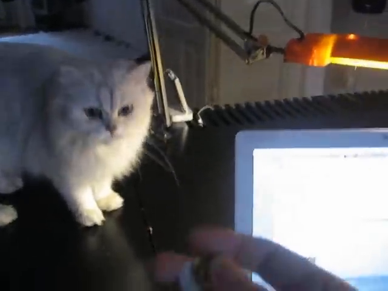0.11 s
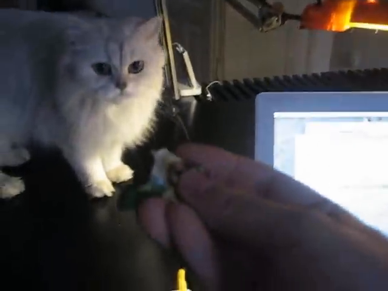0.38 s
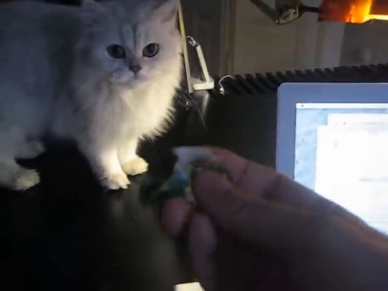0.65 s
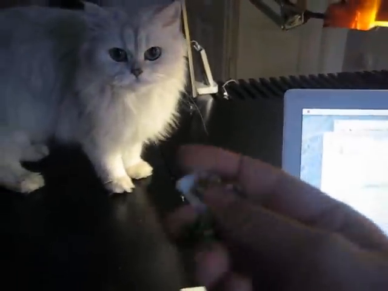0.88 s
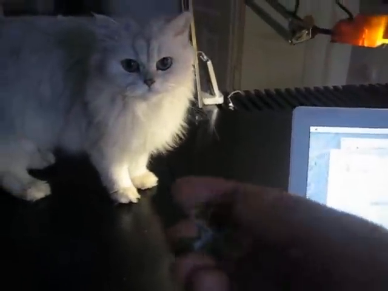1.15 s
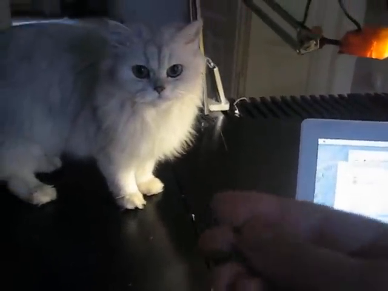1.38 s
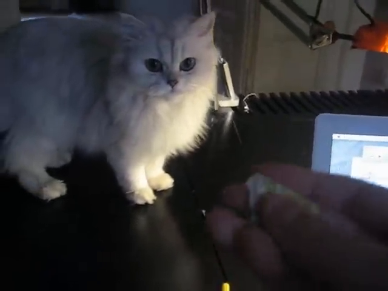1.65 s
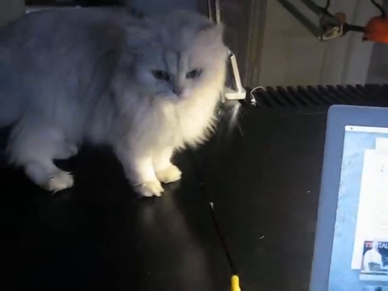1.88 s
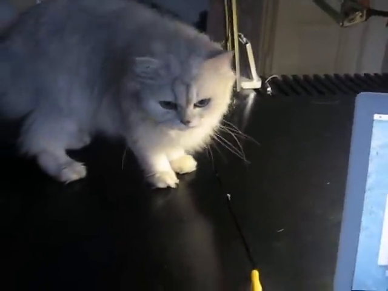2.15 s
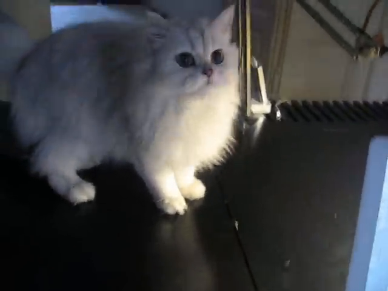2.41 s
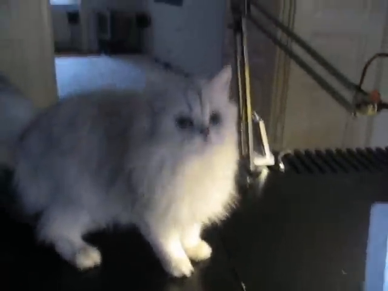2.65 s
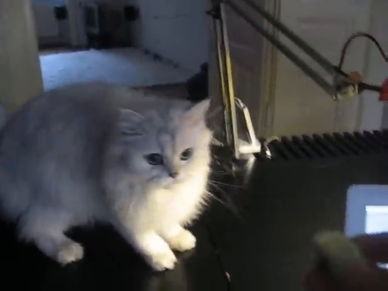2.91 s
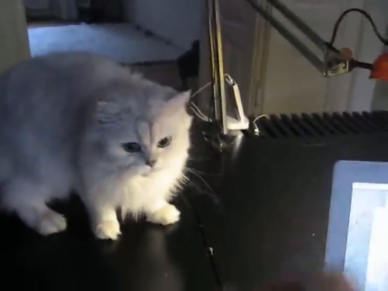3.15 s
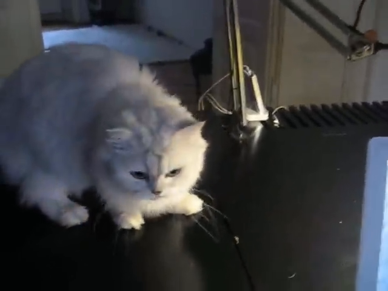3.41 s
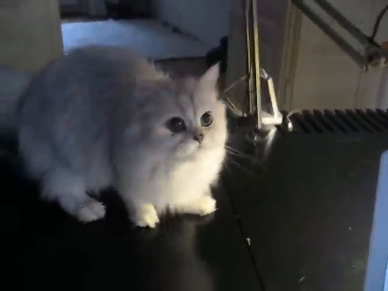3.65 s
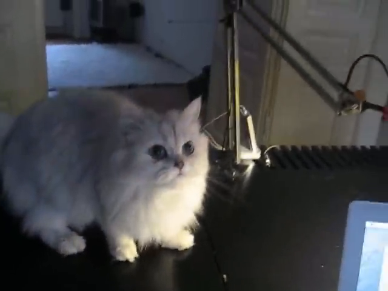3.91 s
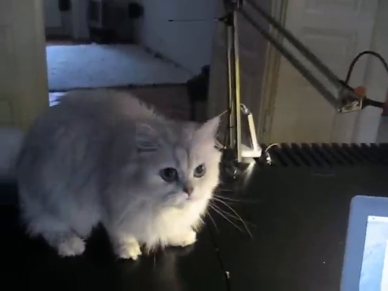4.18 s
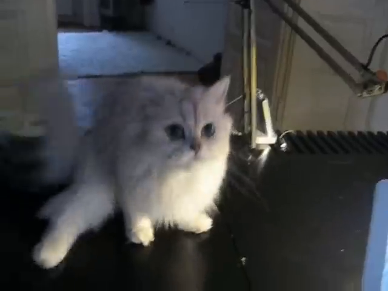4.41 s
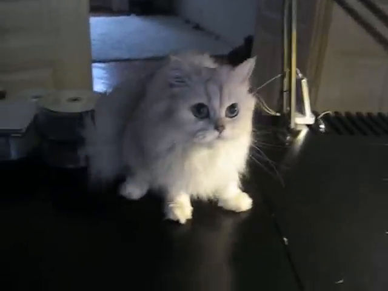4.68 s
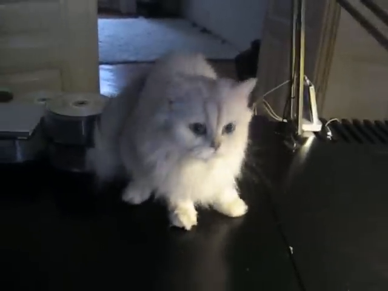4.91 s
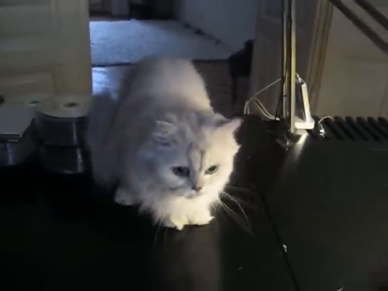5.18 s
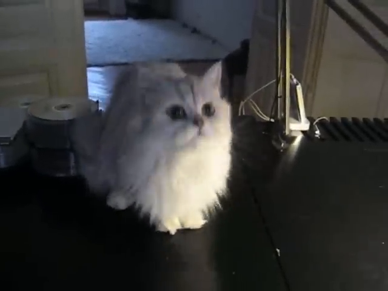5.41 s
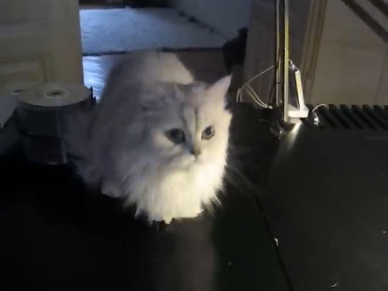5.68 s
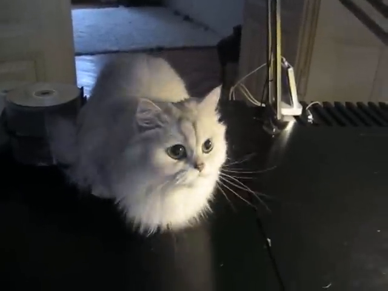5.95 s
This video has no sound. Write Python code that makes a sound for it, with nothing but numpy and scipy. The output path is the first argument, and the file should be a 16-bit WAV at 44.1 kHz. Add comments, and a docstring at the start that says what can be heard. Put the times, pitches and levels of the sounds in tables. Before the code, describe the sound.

Fingers crumple a thin candy wrapper very close to a cheap camera microphone. Sharp, irregular snaps crowd the first second, then come in scattered pops and small rustles, with a few loud cracks later. A quiet small room adds a short faint tail, low rumble and hum. The sound is coarse and gritty, and a couple of tiny hollow taps occur near the end.

```python
"""Crumpled candy wrapper

A wrapper is squeezed near a small camera: creases snap as damped sines over a rustle of tiny grains,
with random crackles, puffs of air and a few hollow taps. A quiet room answers with a decaying noise tail
and rumbles: shaped noise, hum and throb, plus a faint hiss.
The camera samples coarsely, in 8-bit steps, and each sample is held on playback."""
import sys
import numpy as np
from scipy import signal
from scipy.fft import rfft, irfft, next_fast_len
from scipy.io import wavfile
from scipy.ndimage import uniform_filter1d, map_coordinates

SR = 44100
rng = np.random.default_rng(int(sys.argv[2]) if len(sys.argv) > 2 else 0)


def dump(signal):
    """Clip the signal to [-1, 1] and save it as 16-bit WAV at the path in sys.argv[1]."""
    limited = np.clip(np.atleast_2d(signal).T, -1, 1)
    pcm = np.round(limited * 32767).astype(np.int16)
    wavfile.write(sys.argv[1], SR, pcm)


def attenuation_scalar(level_db):
    """Turn a level in dB into a linear amplitude multiplier (20 dB per decade)."""
    decades = np.asarray(level_db, float) / 20
    return 10 ** decades


N = 267274
TIME_S = np.arange(N) / SR


def unit(x):
    """Scaled to rms 1."""
    return x / np.sqrt(np.mean(x ** 2) + 1e-20)


def along(points, hz):
    """Interpolates (Hz, value) points on a log frequency axis."""
    point_hz, value = np.transpose(points)
    return np.interp(np.log(hz + 1), np.log(point_hz + 1), value)


def wobble(knots_per_s):
    """Smooth random curve through normally distributed knots."""
    knots = rng.standard_normal(int(N * knots_per_s / SR) + 4)
    return map_coordinates(knots, [TIME_S * knots_per_s])


def bell(middle_s, length_s, power=2):
    """Smooth swell of height 1; a higher power flattens its top."""
    return np.exp(-(2 * (TIME_S - middle_s) / length_s) ** power)


def filtered(x, response):
    """Multiplies the spectrum of x by a response given as a function of Hz."""
    size = next_fast_len(N + SR // 2)
    return irfft(rfft(x, size) * response(np.fft.rfftfreq(size, 1 / SR)), size)[..., :N]


def narrow(hz, width_hz):
    """Noise in one narrow resonant band, rms 1."""
    return unit(filtered(rng.standard_normal(N), lambda f: 1 / (1 + (2 * (f - hz) / width_hz) ** 2)))


def rings(start_s, gain, hz, t60_s, attack_s, size):
    """Sum of damped sines of size samples, one per row, with random starting phase."""
    k = np.arange(size)
    t = k / SR
    phase = rng.uniform(0, 2 * np.pi, (len(start_s), 1))
    envelope = attenuation_scalar(-60 * t / t60_s[:, None]) * (1 - np.exp(-t / attack_s))
    wave = np.sin(2 * np.pi * hz[:, None] * t + phase) * envelope
    at = np.round(start_s.clip(0) * SR).astype(int)[:, None] + k
    return np.bincount(at.ravel(), (gain[:, None] * wave).ravel(), N + size)[:N]


def hiss():
    """Steady white microphone noise."""
    return attenuation_scalar(-62) * rng.standard_normal(N)


# Activity in the room. Each row: time in seconds, level in dB.
ACTIVITY = [(0.0, -59), (0.91, -60), (1.1, -63), (2.24, -60), (2.63, -62), (3.09, -59), (3.56, -53),
            (3.81, -53), (4.46, -56), (4.74, -56), (4.98, -53), (6.06, -48)]
# Spectrum of the rumble noise. Each row: frequency in Hz, relative level in dB per Hz.
RUMBLE_COLOUR = [(35, -41.5), (60, -7.5), (108, -1), (156, -9), (235, -8), (318, -14), (403, -12.5),
                 (475, -19), (525, -17), (666, -20), (1200, -23.5), (1560, -47), (2640, -120)]


def rumble():
    """Low shaped noise, a wavering hum and a deep throb, all rising with the activity in the room."""
    activity_db = np.interp(TIME_S, *np.transpose(ACTIVITY))
    mean_db = activity_db.mean()
    rise_db = activity_db - mean_db
    noise_db = mean_db - .6 + .78 * rise_db + 1.5 * wobble(knots_per_s=5)
    hum_db = mean_db - 1.5 + 1.1 * rise_db
    throb_db = mean_db - 6.5 + .7 * rise_db + 10 * bell(middle_s=5, length_s=.8)
    noise = unit(filtered(rng.standard_normal(N), lambda hz: attenuation_scalar(along(RUMBLE_COLOUR, hz))))
    hum = attenuation_scalar(hum_db) * narrow(hz=101, width_hz=14)
    throb = attenuation_scalar(throb_db) * narrow(hz=42, width_hz=10)
    return attenuation_scalar(noise_db) * noise + hum + throb


# Decay of the room. Each row: frequency in Hz, t60 in seconds.
ROOM_DECAY = [(300, .35), (2000, .3), (6000, 0.22)]


def room(x):
    """Convolves with a noise tail of energy 1 in which each frequency dies at its own speed."""
    hz, t, z = signal.stft(rng.standard_normal(SR // 2), SR, nperseg=256)
    decay = attenuation_scalar(-60 * t / along(ROOM_DECAY, hz)[:, None])
    tail = signal.istft(z * decay, SR, nperseg=256)[1]
    return signal.fftconvolve(x, tail / np.linalg.norm(tail))[:N]


# Moments when the quiet signal stays inside one 8-bit step and the grit drops out.
# Each row: middle in seconds, length in seconds.
GRIT_GAPS = [(1.162, 0.019), (1.983, .008), (2.626, 0.018), (2.665, 0.013), (2.985, .008), (3.436, 0.006),
             (4.421, 0.0071)]


def grit_gaps():
    """Gain of the quiet signal: 1, with short deep dips that keep it inside one 8-bit step."""
    middle_s, length_s = np.transpose(GRIT_GAPS)[:, :, None]
    return 1 - .8 * bell(middle_s, length_s, power=4).sum(axis=0)


# Small hollow taps. Each row: start in seconds, level in dB.
TAPS = [(5.6334, -34.5), (5.6626, -33.5), (5.7248, -42)]
# Modes of the tapped object. Each row: frequency in Hz, relative level in dB, t60 in seconds.
TAP_MODES = [(1184, -8, .04), (2540, -1, .028)]


def taps():
    """Something small and hollow is tapped: its modes ring as damped sines."""
    start_s, db = np.transpose(TAPS)
    one = np.ones(len(start_s))
    return sum(rings(start_s, attenuation_scalar(db + mode_db), hz * one, t60_s * one, attack_s=0.00061, size=3000)
               for hz, mode_db, t60_s in TAP_MODES)


# Fingers pushing air as a fold gives way. Each row: start in seconds, peak in dB.
PUSHES = [(.0276, -30), (.109, -29.5), (0.2532, -30), (0.706, -27), (0.7274, -32), (1.7029, -25.5),
          (1.9023, -27.5), (2.0653, -32.5), (2.2174, -24.5), (2.6765, -14.5), (3.9331, -25.5),
          (3.978, -27.5), (4.326, -26), (5.788, -26)]


def pushes():
    """One-sided puffs of pressure that rise in 0.11 ms and fall away smoothly."""
    start_s, db = np.transpose(PUSHES)
    u = np.clip(TIME_S - start_s[:, None], 0, 1) / 0.00011
    return attenuation_scalar(db) @ (u * np.exp(1 - u))


# The hand works the foil. Each row: middle in seconds, length in seconds, effort in dB.
SQUEEZES = [(.01, .12, -43), (.175, .045, -45), (.24, .12, -46), (.39, .12, -53), (.5, .08, -51),
            (.63, .06, -55), (.705, .05, -36), (.75, .07, -49), (.85, .05, -47), (1.0, .025, -37),
            (.97, .1, -52), (1.27, .04, -55), (1.37, .1, -53), (1.48, .05, -46), (1.63, .08, -56),
            (1.7, .03, -43), (1.77, .05, -50), (1.89, .14, -53), (2.08, .09, -53), (2.24, .06, -53),
            (2.39, .08, -52), (2.88, .1, -57), (3.04, .06, -58), (3.32, .06, -55), (3.57, .1, -51.5),
            (3.79, .06, -46), (3.9, .1, -53), (4.03, .12, -50), (4.48, .1, -50), (4.63, .08, -56),
            (4.76, .06, -50), (4.93, .12, -50), (5.17, .14, -49), (5.32, .14, -53), (5.57, .14, -52),
            (5.77, .08, -48), (5.92, .16, -53), (6.06, .05, -54)]


def effort_db():
    """Effort of the hand: a resting level plus the power of one smooth swell per squeeze."""
    resting_db = -60.5
    middle_s, length_s, db = np.transpose(SQUEEZES)[:, :, None]
    swells = attenuation_scalar(2 * db) * bell(middle_s, length_s)
    return 10 * np.log10(attenuation_scalar(2 * resting_db) + swells.sum(axis=0))


def rustle():
    """Tiny creases as very short grains, a few bigger than the rest, over the hiss of skin on foil."""
    count = 14000
    start_s = rng.random(count) * N / SR
    hz = np.clip(3200 * np.exp(.45 * rng.standard_normal(count)), 600, 9000)
    size_db = 3.2 * np.minimum(rng.exponential(1, count), 4.5)
    grains = rings(start_s, attenuation_scalar(size_db), hz, 4 / hz, attack_s=5e-5, size=200)
    rub = filtered(rng.standard_normal(N), lambda f: f / (f + 1500) / (1 + (f / 6000) ** 4))
    level_db = effort_db() - 2.5 + 1.5 * wobble(knots_per_s=40)
    return attenuation_scalar(level_db) * unit(unit(grains) + attenuation_scalar(-3) * unit(rub))


def crackle():
    """Lesser creases pop at random moments, louder while the hand squeezes."""
    count, over_effort_db, spread_db, t60_s = 1500, 10, 3.6, .0035
    when = rng.random(count)
    hz = 1700 + 3800 * rng.random(count)
    size_db = over_effort_db + spread_db * np.minimum(rng.exponential(1, count), 3.5)
    db = effort_db()[(when * N).astype(int)] + size_db
    return rings(when * N / SR, attenuation_scalar(db), hz, np.full(count, t60_s), attack_s=1e-4, size=300)


# Creases that buckle. Each row: start in seconds, level in dB, low panel in Hz, high panel in Hz,
# high panel over low panel in dB.
SNAPS = [(0.0057, -29.5, 3000, 4050, 13), (0.0276, -9.5, 1700, 3700, -5), (0.109, -11.0, 2000, 4780, -2),
         (0.1568, -26.5, 2330, 4790, -5), (0.1598, -30.0, 2020, 3890, -4), (0.1735, -30.5, 1840, 4930, 8),
         (0.1818, -31.0, 2830, 5500, 18), (0.191, -35.5, 2240, 4340, 5), (0.2135, -26.5, 1950, 4840, 6),
         (0.2175, -32.5, 1630, 4320, 20), (0.2536, -7.0, 2790, 3900, 9), (0.2865, -10.5, 1750, 3700, 6),
         (0.2909, -19.0, 2190, 4590, 15), (0.3002, -19.0, 2390, 4620, 6), (0.3385, -33.0, 2230, 4380, 12),
         (0.3425, -22.5, 2010, 4810, 3), (0.4479, -20.5, 1760, 4520, -4), (0.4741, -30.0, 2860, 3910, -1),
         (0.4952, -18.5, 1920, 4160, -5), (0.5017, -26.5, 1320, 4730, 12), (0.51, -27.0, 2430, 4050, -10),
         (0.6484, -16.5, 1650, 4270, 0), (0.6549, -18.5, 1940, 4270, 18), (0.6851, -27.5, 2320, 3500, -12),
         (0.694, -12.0, 1930, 4690, 5), (0.7059, -18.0, 1780, 5380, -8), (0.7267, 2.0, 1650, 3730, 8),
         (0.7359, -35.0, 3000, 3910, 2), (0.7438, -12.0, 2520, 3580, -13), (0.7502, -26.5, 1790, 3540, 9),
         (0.7604, -23.0, 1660, 4450, 1), (0.7849, -14.5, 2520, 3530, -6), (0.8429, -22.5, 2220, 4120, 5),
         (0.8503, -22.5, 2670, 3480, -1), (0.8568, -15.0, 1950, 3900, -2), (0.8991, -9.0, 3000, 4210, 14),
         (0.9809, -16.0, 2370, 3200, -10), (0.9836, -30.0, 2020, 4470, -8), (0.9977, -24.0, 1950, 3780, 3),
         (1.0023, -25.5, 2260, 5110, 0), (1.0055, -23.0, 2470, 4660, 5), (1.0233, -10.5, 1920, 4440, 5),
         (1.098, -28.0, 2250, 4270, -2), (1.102, -32.0, 1580, 4200, 5), (1.2572, -33.5, 2720, 4140, 6),
         (1.2789, -24.5, 1900, 5240, -7), (1.3283, -28.0, 2050, 3500, -7), (1.3367, -20.0, 2690, 4200, 5),
         (1.3854, -32.0, 2160, 3960, -4), (1.4738, -29.0, 1590, 4130, 5), (1.4837, -19.5, 2250, 3770, -5),
         (1.5739, -34.5, 1910, 4700, -3), (1.6842, -28.5, 2220, 3200, -12), (1.6972, -24, 2950, 4600, 0),
         (1.7002, -9.5, 2060, 4230, -3), (1.7023, -16, 3140, 4600, 8), (1.7039, -24.0, 2580, 4730, 2),
         (1.7724, -20.0, 2820, 4250, 3), (1.9015, -19.0, 1970, 3830, -6), (1.9227, -30.0, 2510, 4610, 3),
         (1.9417, -32.5, 2460, 4360, 5), (1.9494, -27.5, 1760, 3470, 6), (2.0241, -24.5, 2950, 3650, -2),
         (2.0506, -25.0, 1910, 4500, 4), (2.0653, -15.5, 2260, 4100, -20), (2.2178, -15.0, 2720, 4090, 2),
         (2.2539, -25.5, 2190, 3540, -2), (2.3842, -7.5, 2470, 5500, 2), (2.4418, -14.0, 2180, 4880, 4),
         (2.6088, -25.0, 2010, 3810, 0), (2.6765, -4.0, 1970, 4130, 10), (2.6967, -32.0, 2200, 3980, 8),
         (2.7519, -28.0, 2150, 4620, -12), (3.0936, -27.5, 2150, 4150, 14), (3.1731, -19.0, 2740, 4460, 2),
         (3.224, -32.5, 1880, 4190, 20), (3.2884, -21.0, 2760, 3610, 20), (3.7775, -8.0, 2120, 5120, 8),
         (3.9332, -9.0, 2380, 3210, -5), (3.9528, -22.5, 1870, 4270, -3), (3.9781, 0.5, 2930, 3530, 6),
         (4.0751, -15.5, 2450, 5500, 20), (4.212, -15.5, 1850, 3400, -6), (4.2957, -25.5, 2060, 3400, -6),
         (4.3261, -11.0, 2900, 3260, -1), (4.4721, -22.5, 2070, 3670, -12), (4.4771, -31.0, 2600, 3700, 1),
         (4.5177, -23.5, 1760, 3720, 3), (4.5241, -17.0, 2660, 4510, -6), (4.7557, -24.0, 2900, 4360, 5),
         (4.8762, -18.5, 2300, 4760, -6), (5.1766, -32.5, 1710, 3850, -3), (5.5467, -26.0, 2240, 5440, 7),
         (5.5818, -14.0, 1940, 3960, 6), (5.7633, -35.5, 2340, 4490, 7), (5.7882, -15.0, 2500, 4590, 7),
         (5.8438, -27.5, 2010, 4980, 1), (6.0345, -2.5, 3000, 4680, 8), (6.036, -20, 2900, 3800, 0),
         (6.0516, -15.0, 2810, 4340, 8)]


def snaps():
    """A crease buckles: two panels ring briefly; neighbours tick just before and let go just after."""
    start_s, db, low_hz, high_hz, balance_db = np.transpose(SNAPS)
    t60_s = .0022 - .00009 * db  # softer snaps ring longer
    low_gain = attenuation_scalar(db + 2.5 - balance_db.clip(0))
    high_gain = attenuation_scalar(db + 2.5 + balance_db.clip(None, 0))
    low = rings(start_s, low_gain, low_hz, t60_s, attack_s=1e-4, size=500)
    high = rings(start_s, high_gain, high_hz, t60_s, attack_s=1e-4, size=500)

    # the broad tick of the fold itself
    crack_hz = 3300 + 60 * balance_db.clip(-12, 15)
    crack = rings(start_s, attenuation_scalar(db - 4.5), crack_hz, np.full(len(db), .0007), attack_s=3e-5, size=60)

    # per snap: six neighbours after, four before, weaker with distance in time
    delay, pitch = rng.exponential(1, (2, len(db), 10))
    shift_s = np.hstack([.0012 * delay[:, :6], -.002 * delay[:, 6:]])
    small_db = db[:, None] + np.where(shift_s > 0, -13, -20) - 2500 * abs(shift_s)
    small_hz = 1500 + 1600 * pitch
    small_s = start_s[:, None] + shift_s
    small = rings(small_s.ravel(), attenuation_scalar(small_db).ravel(), small_hz.ravel(),
                  np.full(shift_s.size, .0015), attack_s=4e-5, size=150)
    return low + high + crack + small


def scene():
    """Foil close by, a little room, rumble and microphone hiss."""
    foil = snaps() + grit_gaps() * (rustle() + crackle())
    no_bass = signal.butter(2, 1100, "high", fs=SR, output="sos")  # the foil sound keeps above about 1 kHz
    near = signal.sosfilt(no_bass, foil) + taps() + pushes()
    background = attenuation_scalar(-16) * room(near) + rumble() + hiss()
    return (near + grit_gaps() * background)[None]


def smear(x, grain_db, peak_db, empty_db):
    """Smears each sound into grainy noise just before and after it, and drops weak treble patches."""
    mean = x.mean()
    hz, _, z = signal.stft(x - mean, SR, nperseg=512)
    level = np.sqrt(abs(uniform_filter1d(abs(z) ** 2, size=12, axis=1)))
    ceiling = 4.3 * np.median(level, axis=2, keepdims=True)
    lasting = uniform_filter1d(np.minimum(level, ceiling), size=3, axis=2)
    grain = attenuation_scalar(grain_db) * lasting + attenuation_scalar(peak_db) * level  # sharp peaks carry less of it
    noise = rng.standard_normal(z.shape) + 1j * rng.standard_normal(z.shape)
    strong = level > attenuation_scalar(empty_db) * level.mean(axis=1, keepdims=True)
    kept = strong | (hz[:, None] < 6000)
    return mean + signal.istft((z + grain * noise) * kept, SR, nperseg=512)[1][:, :N]


def low_pass(x):
    """Removes everything above the highest recorded frequency."""
    return signal.sosfilt(signal.butter(12, 15170, fs=SR, output="sos"), x)


def record(dry):
    """Few samples in 8-bit steps, each held: grit on quiet sound, mirror images around the sample rate."""
    camera_hz, step, top_hz = 11032.5, 1 / 128, 13900
    slot = np.floor(np.arange(N) * camera_hz / SR)
    held = dry[:, np.round(slot * SR / camera_hz).astype(int)]
    coarse = step * np.round(held / step - .8)  # the converter rests a little under zero
    smeared = smear(coarse, grain_db=-16, peak_db=-23, empty_db=-18)
    band = filtered(smeared, lambda hz: 1 / (1 + (hz / top_hz) ** 140))
    return low_pass(band)


dry = scene()
out = record(dry)
dump(out)
```